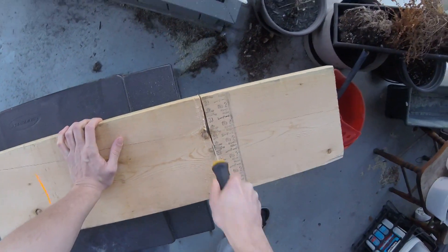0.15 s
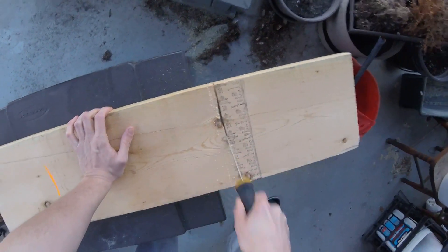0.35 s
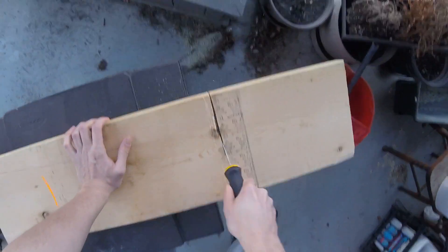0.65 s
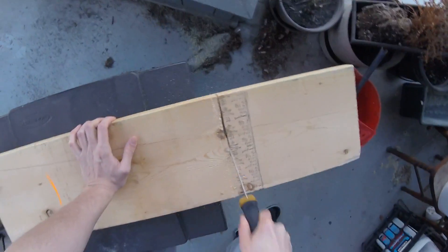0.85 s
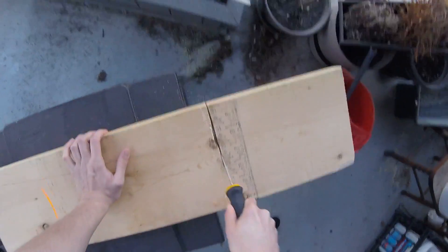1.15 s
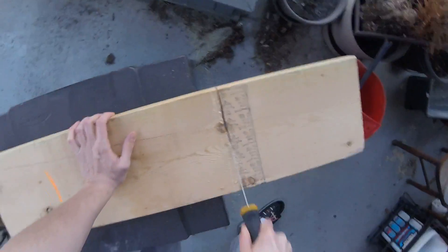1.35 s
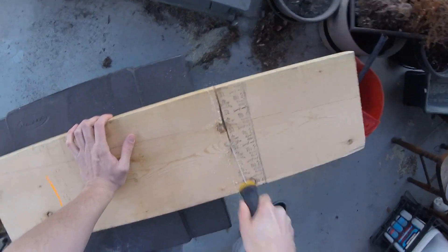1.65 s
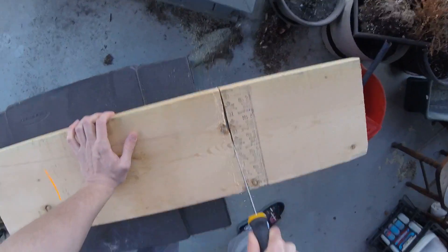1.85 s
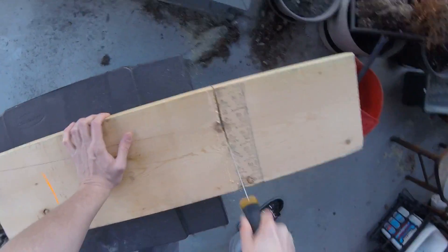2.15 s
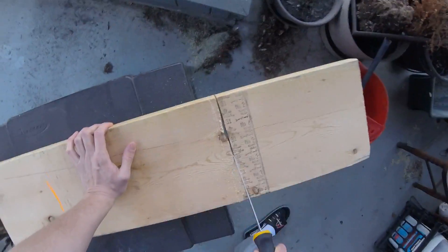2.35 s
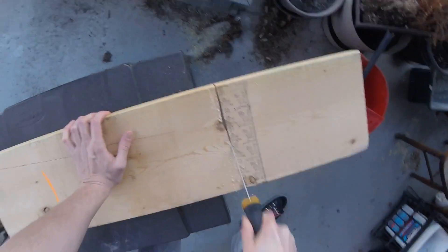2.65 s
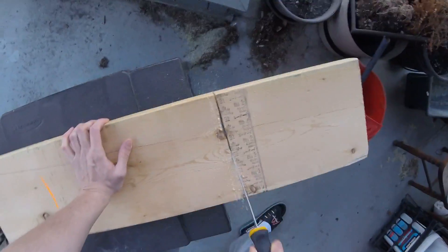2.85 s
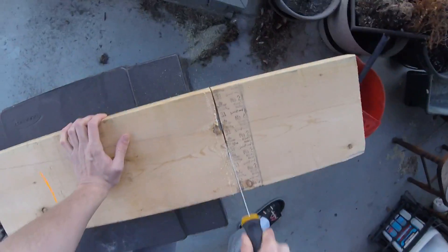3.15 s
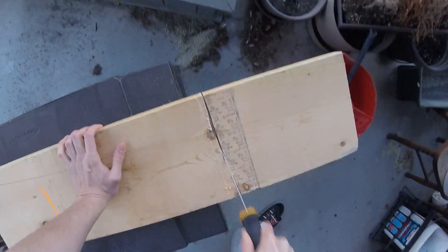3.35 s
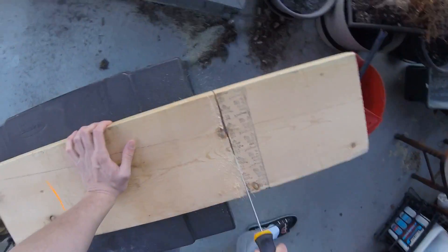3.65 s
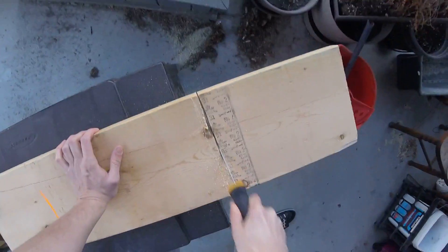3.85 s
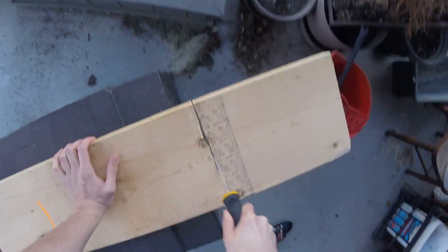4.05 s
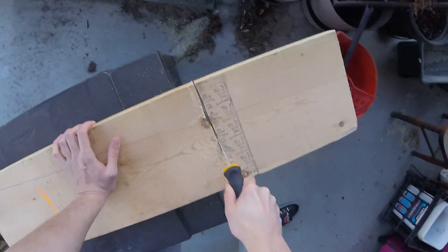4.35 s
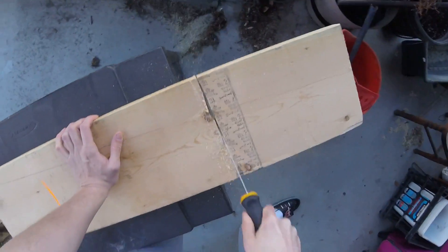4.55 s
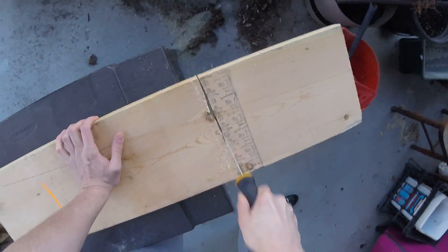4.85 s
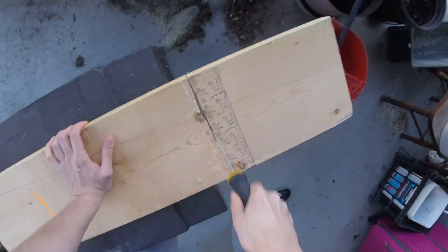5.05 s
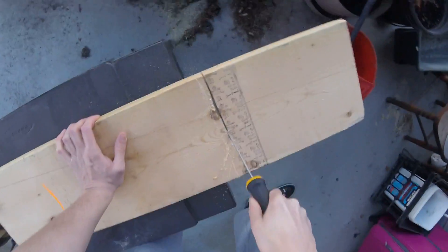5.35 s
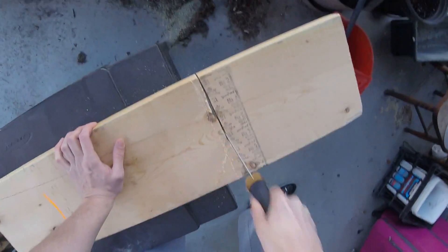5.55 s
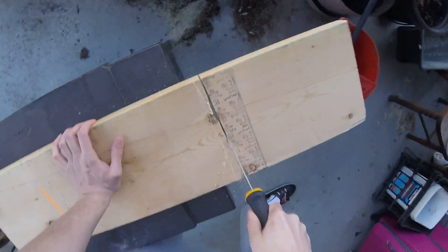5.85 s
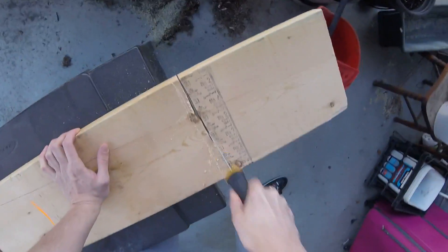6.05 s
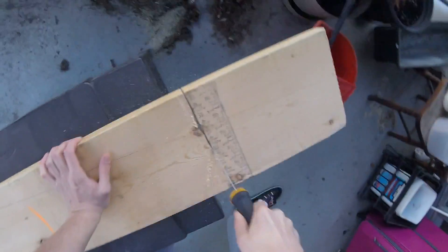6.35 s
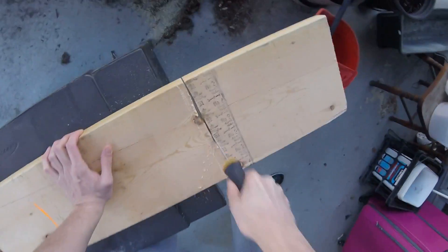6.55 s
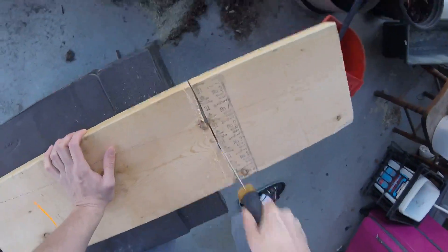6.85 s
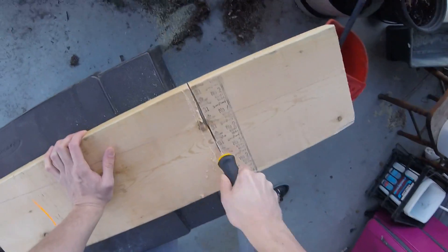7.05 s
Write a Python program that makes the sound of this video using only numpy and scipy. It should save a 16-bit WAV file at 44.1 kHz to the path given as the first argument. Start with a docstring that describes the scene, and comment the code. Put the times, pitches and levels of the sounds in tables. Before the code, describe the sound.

A small handsaw rasps quickly back and forth through a softwood board, hollow and woody with a metallic ring, while low wind buffets the microphone.

```python
"""Quick back-and-forth sawing: a small handsaw cuts a softwood board held by hand on a concrete patio.
The arm makes about four strokes each way per second. Tooth snaps and cracking fibres ring the board and blade
through resonances; shaped noise makes the hiss, and now and then the teeth bite in hard.
Around it are splinters, short reflections, a low boom from the board, jolts and air buffeting the microphone."""
import sys
import numpy as np
from scipy import signal
from scipy.fft import rfft, irfft
from scipy.io import wavfile

SR = 44100
rng = np.random.default_rng(int(sys.argv[2]) if len(sys.argv) > 2 else 0)


def file_out(sig):
    """Save sig as 16-bit WAV at sys.argv[1]."""
    # one column per channel
    cols = np.atleast_2d(sig).T
    # limit, then scale
    lim = np.clip(cols, -1, 1)
    pcm = np.round(lim * 32767).astype(np.int16)
    wavfile.write(sys.argv[1], SR, pcm)


N = 316638
TIME = np.arange(N) / SR

# Swings of the arm, a return and then the cut.
# Each row: time the teeth catch in seconds, length of the cut in seconds, cut effort in dB, return effort in dB.
STROKES = [(0.166, .098, 1.5, -4), (0.438, 0.087, 2.5, -4), (0.676, 0.09, -3, 4), (0.940, 0.087, -3.5, -6),
           (1.181, 0.099, -1.5, 2.5), (1.443, 0.11, 2, -0.5), (1.709, 0.096, 2, 3.5), (1.965, 0.11, -1, -3),
           (2.249, 0.086, 1, -4), (2.502, 0.088, 1, -4), (2.742, 0.085, 2.5, 0), (3.001, 0.11, 2, 0.5),
           (3.263, .103, -0.5, -2), (3.528, 0.091, 5, 2.5), (3.799, 0.11, 3.5, 3), (4.085, .120, 3, 2),
           (4.375, 0.11, -1, 2), (4.683, 0.1, 0, -4), (4.956, .096, 1, 1), (5.218, 0.1, 1, -3.5),
           (5.480, .082, 2, 0.5), (5.738, .105, -1.5, 1), (5.987, 0.087, -1.5, -1), (6.242, 0.09, -2.5, -4),
           (6.507, 0.077, -1.5, -6), (6.757, 0.097, -0.5, -2), (7.033, 0.096, -0.5, -3.5)]
TURN_S, REST_S = .029, .046   # pause after a cut; pause before the next cut
# Push at effort 0. One row: board in dB, blade in dB, scrape in dB, hiss in dB.
CUT_PUSH = (-21.5, -20, -28, -35.5)
RETURN_PUSH = (-29, -27, -30.5, -40)
# How much effort changes each push. One row: board, blade, scrape, hiss, all in dB per dB of effort.
PUSH_PER_EFFORT = (0.97, 1.35, 0.89, 0.66)
LOAD_BUILD_DB = 1.5   # rise of the load on board and blade along a cut
TOOTH_HZ = 700   # teeth per second at full speed, before random wander

# How freely the blade rings, as the hand leans on it. Each row: time in seconds, level change in dB.
BLADE_LEVEL = [(0, 1.5), (.5, -0.5), (1.0, 1.5), (1.5, 0.5), (2.0, 3), (2.4, -3), (3.2, 1.5), (3.6, -4),
               (4.0, -2.5), (4.7, -2.5), (5.2, -2.5), (5.8, -0.5), (7.1, 1)]
# How the hiss changes over the job. Each row: time in seconds, level change in dB.
HISS_LEVEL = [(0, -0.5), (1.1, -1.5), (2.3, 0), (3.6, 2.5), (4.25, -2), (4.8, 0.5), (5.5, -3.5),
              (6.5, -4.5), (7.15, -1)]

# The teeth dig into the wood.
# Each row: centre in seconds, bell width (centre to shoulder) in seconds, relative strength in dB, crunch 0 to 1.
BITES = [(0.491, 0.016, -10, 0.67), (0.743, 0.0099, -11.5, .5), (1.26, 0.0046, -8, 0.21),
         (1.526, 0.0065, -7, 1), (1.749, 0.009, -12, 0.46), (1.785, 0.0088, -11.5, .9),
         (2.051, 0.0095, -9.5, 0.43), (2.278, 0.012, -6.5, .09), (2.549, 0.029, -12, 0.24),
         (2.806, 0.0089, -11.5, 0.61), (3.079, 0.01, -10, .6), (3.324, 0.024, -13.5, .6),
         (3.557, 0.0051, -10, 0.16), (3.87, 0.015, -16.5, .5), (4.172, 0.015, -18, 0.9),
         (4.457, 0.0088, -10, 1), (4.754, 0.0078, -9, 0.14), (5.52, 0.028, -15, .5),
         (5.783, 0.011, -8.5, 0.3), (6.038, .016, -14, 0.34), (6.309, 0.017, -18.5, .5),
         (6.561, .016, -13, 0.15), (6.826, 0.031, -17, 0.45), (7.102, 0.0077, -8.5, 0.23)]
BITE_BLADE_DB = -10.5   # how much of a bite reaches the blade
# Short swells. Each row in these four: centre in seconds, bell width in seconds, relative strength in dB.
# The blade binds in the kerf (the slot it cuts) and rings.
BINDS = [(0.578, 0.012, -21.5), (0.745, 0.0062, -14.5), (0.987, 0.02, -25), (2.549, 0.019, -19),
         (3.324, 0.021, -16), (4.165, 0.016, -17.5), (4.412, 0.0083, -19), (4.456, 0.006, -14),
         (4.867, 0.013, -14.5), (5.135, .022, -24.5), (5.398, .018, -16.5)]
# Fibres split off during a cut with a bright rasp.
RASPS = [(0.232, .016, -27.5), (0.712, .01, -25), (1.75, .015, -26), (2.778, .011, -24), (3.565, .025, -23),
         (4.43, .02, -35), (4.995, 0.02, -29), (5.27, .02, -33), (7.085, 0.027, -26.5)]
# The backs of the teeth skid harshly on a return.
SKIDS = [(0.06, 0.036, -29.5), (0.577, .012, -29), (3.425, .016, -21.5), (4.28, 0.02, -19.5),
         (4.568, 0.011, -18.5), (4.868, 0.015, -21), (5.403, 0.012, -21.5)]
# The blade judders on a return.
JUDDERS = [(0.338, .012, -21)]

# Ringing tones of the wood. Each row: pitch in Hz, width in Hz, relative level in dB.
BOARD_MODES = [(418.4, 16.1, -0.5), (464, 14.5, 2.5), (542.4, 34, -12), (595.7, 16, -5), (729, 24.7, -9.5),
               (796, 18.3, -7.5)]
# Ringing tones of the blade, with the same columns: pitch in Hz, width in Hz, relative level in dB.
BLADE_MODES = [(945.7, 18.4, -3.5), (964, 33, -17), (1075, 39, 2.5), (1112.5, 29.5, -1.5),
               (1198, 133, -20.5), (1353.5, 53, -6.5), (1401.4, 109, -4), (1471, 66, -2), (1504, 63, -9.5)]
# Upper tones rung by the scraping teeth: pitch in Hz, width in Hz, relative level in dB.
SCRAPE_MODES = [(1644, 95, -5.5), (1777.5, 72, 2.5), (1815, 55, 6), (1912, 43, -4), (2137, 100, -3),
                (2246, 38, 2.5), (2407, 53, -3), (2703, 82, -6.5), (2935, 144, -8.5)]
# High tones of the steel: pitch in Hz, width in Hz, relative level in dB.
STEEL_MODES = [(3250, 220, -12), (3850, 150, -5.5), (4078, 39, 1.5), (4690, 180, -8), (5910, 170, -7.5),
               (9100, 310, -35), (11000, 400, -42)]

# Tone colour of the hiss, and of splinters. Each row: pitch in Hz, relative level in dB per Hz.
HISS_COLOUR = [(2500, -13.5), (3200, -2), (4300, -3), (5300, -1), (6200, -4), (6900, -5.5), (7600, -16.5),
               (9000, -15), (10000, -30), (11200, -30), (12000, -69)]
# Tone colour of the tooth backs skating: pitch in Hz, relative level in dB per Hz.
SKATE_COLOUR = [(700, -19), (1300, 4.5), (1900, -4), (2700, 0), (3500, -13), (4800, -13), (7000, -44)]
# Tone colour of the board's boom: pitch in Hz, relative level in dB per Hz.
BOOM_COLOUR = [(110, -13.5), (160, -0.5), (210, 7), (260, -9.5), (350, -8), (520, -1.5), (900, -33)]
# Tone colour of microphone jolts: pitch in Hz, relative level in dB per Hz.
JOLT_COLOUR = [(40, -13.5), (90, 2.5), (160, -6), (300, -6), (700, -33)]
# Tone colour of air buffeting the microphone: pitch in Hz, relative level in dB per Hz.
BUFFET_COLOUR = [(18, 3), (28, -1.5), (55, -0.5), (90, -3), (130, -5.5), (200, -11.5), (400, -16),
                 (900, -40.5)]
# Tone colour of the quiet outdoor air: pitch in Hz, relative level in dB per Hz.
AIR_COLOUR = [(100, -13.5), (500, -9), (1500, -13), (3000, -25), (6500, -31), (9000, -43.5), (12000, -67)]

# Splinters snap off. Each row: start in seconds, relative level in dB.
SPLINTERS = [(4.7419, -10), (5.709, -25.5), (6.0446, -19), (6.244, -18)]
# The microphone is jolted. Each row: start in seconds, relative level in dB.
JOLTS = [(1.611, -16.5), (1.671, -14.5), (2.109, -11.5), (3.019, -3.5), (3.425, -3), (3.629, -10.5),
         (4.119, -15), (5.699, -14), (6.559, -7), (6.93, -17)]
# How loudly the board booms on its support. Each row: time in seconds, level in dB.
ROCKING = [(0.2, -33), (0.5, -17.5), (0.76, -28.5), (1.6, -26.5), (2.6, -29.5), (3.1, -26), (3.85, -29),
           (4.45, -25.5), (5.0, -15.5), (5.5, -18), (6.3, -25), (6.85, -13), (7.15, -18)]
# The boom's peak as a share of the cut's length, then its rise and fall in dB per second.
BOOM_PEAK, BOOM_RISE_DB_PER_S, BOOM_FALL_DB_PER_S = 0.62, 212.5, 131.5
# The breeze on the microphone. Each row: time in seconds, level in dB.
BREEZE = [(0, -32.5), (.65, -32), (.85, -40.5), (1.5, -37), (1.7, -29.5), (2.3, -26.5), (2.9, -23.5),
          (3.2, -23), (3.9, -20.5), (4.35, -23.5), (4.9, -30.5), (5.3, -21.5), (6.35, -25), (6.9, -16.5),
          (7.18, -18)]
# Gusts on the microphone. Each row: centre in seconds, bell width in seconds, level in dB.
GUSTS = [(1.62, 0.014, -16), (1.7, 0.011, -23.5), (1.95, 0.027, -23), (3.19, .016, -20), (3.64, 0.025, -15),
         (3.82, .012, -16.5), (3.93, 0.02, -13), (4.12, 0.019, -13.5), (4.57, 0.028, -18.5),
         (5.71, 0.021, -13), (6.24, 0.016, -19), (6.55, .028, -9), (6.73, 0.015, -19), (6.95, .028, -11)]

CUTOFF_HZ = 11900   # top of the finished sound


def saw():
    """Teeth and fibres shake the board and the blade, and hiss in the kerf."""
    speed, returning, force = arm()
    board, blade, scrape, hiss = force * from_db(2.48 * drift(40))   # hard and soft grain
    board_bite, blade_bite = digging()
    snaps, tearing = teeth(speed), fibres()
    rub = 0.56 * snaps + 0.79 * tearing
    blade_bite = blade_bite + swells(BINDS) * rub
    body = ringing_body(board, blade, board_bite, blade_bite, rub, tearing, returning)
    # the whole plank flexes
    plank_force = board * rub + board_bite
    bending = from_db(-20) * resonate(plank_force, [(183.3, 8.2, -6.5), (213.0, 16.0, -1.5)])
    rasp = scraping(scrape, blade_bite, rub, returning)
    skate = skating(scrape, returning)
    return body + bending + rasp + skate + hissing(hiss, snaps, tearing)


def arm(catch_s=0.0071, release_s=0.0094):
    """Arm swings give blade speed 0 to 1, contact on returns, and the force on board, blade, scrape and hiss."""
    speed, returning, force = np.zeros(N), np.zeros(N), np.zeros((4, N))
    # share of each force that needs no speed: the hiss starts first
    rest = np.array([[.35], [.35], [.5], [.55]])
    for catch, release, cutting, levels in passes():
        near = slice(max(int((catch - .05) * SR), 0), int((release + .08) * SR))
        t = TIME[near]
        travel = np.clip((t - catch) / (release - catch), 0, 1)
        swing = np.sin(np.pi * travel ** .9)
        # the teeth catch abruptly and let go more gently
        grip = 1 / (1 + np.exp((catch - t) / catch_s))
        contact = grip / (1 + np.exp((t - release) / release_s))
        push = from_db(levels)[:, None] * contact * (rest + (1 - rest) * swing)
        # sawdust fills the teeth, so the load builds along a cut
        push[:2] *= from_db(LOAD_BUILD_DB * cutting * (travel - .5))
        speed[near] += swing
        returning[near] += contact * (1 - cutting)
        force[:, near] += push
    force[1] *= from_db(in_time(BLADE_LEVEL))
    force[3] *= from_db(in_time(HISS_LEVEL))
    return speed, returning, force


def passes():
    """Split each swing into a return and a cut: catch s, release s, cutting 0 or 1, dB of the four forces."""
    rows, last_release = [], 0
    for catch, length, cut_db, return_db in STROKES:
        release = catch + length
        return_levels = np.add(RETURN_PUSH, np.multiply(PUSH_PER_EFFORT, return_db))
        cut_levels = np.add(CUT_PUSH, np.multiply(PUSH_PER_EFFORT, cut_db))
        rows.append((last_release + TURN_S, catch - REST_S, 0, return_levels))
        rows.append((catch, release, 1, cut_levels))
        last_release = release
    return rows


def teeth(speed, jitter=.1, uneven_db=2.0, slowest=.3):
    """One snap per tooth, so the rasp rises and falls in pitch with the blade's speed."""
    rate = TOOTH_HZ * (slowest + (1 - slowest) * speed)
    rate = rate * np.exp(jitter * drift(90) + .08 * drift(3))
    passing = tooth_ticks(rate)
    snaps = passing * from_db(uneven_db * rng.standard_normal(N)) / np.sqrt(rate)
    return rms_one(snaps - np.mean(snaps))


def tooth_ticks(rate):
    """A single-sample tick each time another tooth passes, at a rate in teeth per second."""
    return np.diff(np.floor(np.cumsum(rate) / SR), prepend=0)


def fibres(per_s=14000, size_db=2.5, clump_db=0.73):
    """Small random cracks of tearing fibres, in clumps."""
    cracks = (rng.random(N) < per_s / SR) * rng.choice([-1, 1], N)
    sizes = from_db(size_db * np.minimum(rng.exponential(1, N), 4))
    return rms_one(cracks * sizes * from_db(clump_db * drift(110)))


def digging(tooth_hz=465, braking_s=.06, jitter=.07, uneven_db=5.0, ring_up_s=.005):
    """Smooth bites snap steadily near the board's main resonance; crunchy ones tear fibres and slow in pitch."""
    board, blade = np.zeros(N), np.zeros(N)
    wander, tearing = drift(120), fibres()
    heights = from_db(uneven_db * rng.standard_normal(N))
    for s, half, db, crunch in BITES:
        near = slice(max(int((s - .07) * SR), 0), int((s + .07) * SR))
        t = TIME[near] - s + ring_up_s   # the force peaks just before the ring does
        # the wood brakes the blade, most of all in a crunchy bite
        rate = tooth_hz * np.exp((.25 + crunch) * (jitter * wander[near] - t / braking_s))
        snaps = tooth_ticks(rate) * heights[near]
        snaps = rms_one(snaps - snaps.mean())
        torn = 0.94 * crunch
        bump = np.exp(-(t / half) ** 2 / 2)
        mixture = np.sqrt(1 - torn) * snaps + np.sqrt(torn) * tearing[near]
        board[near] += from_db(db - 2.5) * bump * mixture
        blade[near] += from_db(db + BITE_BLADE_DB) * bump * (0.71 * snaps + 0.62 * tearing[near])
    return board, blade


def ringing_body(board, blade, board_bite, blade_bite, rub, tearing, returning):
    """Rubbing and bites ring the wood and the flexing blade at their own resonances."""
    wood_force = board * rub * (1 - 0.21 * returning) + board_bite
    wood = from_db(0.58) * driven(wood_force, BOARD_MODES, vary_db=1.5)
    # the blade judders as it skates back
    judder_force = (board * returning + swells(JUDDERS)) * tearing
    wood += from_db(-1.5) * resonate(judder_force, [(613.7, 40, 0)])
    plate = from_db(-0.36) * flex(driven(blade * rub + blade_bite, BLADE_MODES, vary_db=1.5))
    body = filtered(wood + plate, 4, 2100, "low")
    return filtered(body, 2, 260, "high")


def scraping(scrape, blade_bite, rub, returning):
    """Cutting teeth ring the upper modes, less strongly on the way back."""
    scrape_force = np.hypot(scrape, swells(RASPS)) * rub * (1 - 0.41 * returning)
    force = scrape_force + from_db(-23.5) * blade_bite
    rasp = from_db(1.94) * flex(resonate(force, SCRAPE_MODES, vary_db=2.5))
    return filtered(rasp, 3, [1300, 3700], "band")


def skating(scrape, returning):
    """On the way back the backs of the teeth skate with a broader rasp."""
    level = np.hypot(scrape * returning, swells(SKIDS))
    return from_db(-3.0) * colour(level * fibres(), SKATE_COLOUR)


def hissing(hiss, snaps, tearing):
    """Friction in the kerf makes noisy hiss and rings the high tones of the steel."""
    friction = hiss * (0.36 * snaps + 0.75 * tearing + .5 * rng.standard_normal(N))
    steel = filtered(resonate(hiss * fibres(), STEEL_MODES), 4, 8000, "low")
    return from_db(-1.0) * colour(friction, HISS_COLOUR) + from_db(-3.5) * steel


def flex(x, depth_s=0.0002):
    """The blade bends as it travels, which pulls its resonances slightly sharp and flat."""
    return np.interp(TIME + depth_s * drift(3.34), TIME, x)


def splinters():
    """Splinters snap off as very short puffs of bright noise."""
    return from_db(-7.5) * bursts(SPLINTERS, HISS_COLOUR, decay_s=0.0012)


def yard(x, t60=0.53):
    """Short scattered reflections off the concrete and the things around."""
    t = TIME[:SR // 3]
    # random echoes fading at 60 dB per t60 seconds, after a short gap
    response = rng.standard_normal(len(t)) * from_db(-60 * t / t60) * (t > .005)
    return signal.fftconvolve(x, response / np.linalg.norm(response))[:N]


def board_boom():
    """Clumped knocks excite the low boom of the board on its support."""
    knocks = rocking() * fibres(per_s=1400, size_db=3.0, clump_db=4.5)
    thud = from_db(-2) * colour(knocks, BOOM_COLOUR)
    return thud + from_db(-5.5) * resonate(knocks, [(185.3, 5.0, -2.5)])


def rocking():
    """Each cut loads the board on its support: the boom builds under it, then dies away."""
    level = np.zeros(N)
    for catch, length, _, _ in STROKES:
        t = TIME - catch - BOOM_PEAK * length
        shape_db = np.minimum(BOOM_RISE_DB_PER_S * t, -BOOM_FALL_DB_PER_S * t)
        level = np.maximum(level, from_db(shape_db))
    return level * from_db(in_time(ROCKING))


def jolts():
    """Jolts of the microphone are quickly fading low noise."""
    return from_db(-6.0) * bursts(JOLTS, JOLT_COLOUR, decay_s=0.013)


def buffeting():
    """Lumpy low noise is moving air on the microphone, swelling in the gusts."""
    buffet = colour(rng.standard_normal(N), BUFFET_COLOUR) * rms_one(from_db(3.7 * drift(42)))
    return np.hypot(from_db(in_time(BREEZE)), swells(GUSTS)) * buffet


def outdoor_air():
    """Quiet outdoor air is steady coloured noise."""
    return from_db(-40.5) * colour(rng.standard_normal(N), AIR_COLOUR)


def driven(force, modes, vary_db, window_s=0.071, ring_s=0.0072):
    """Resonances that give back the power put into them, so the loudness follows the arm's push."""
    ring = resonate(force, modes, vary_db)
    keep = np.exp(-1 / (ring_s * SR))
    fed = signal.lfilter([1 - keep], [1, -keep], force ** 2)
    window = np.hanning(int(2 * window_s * SR))
    # the tiny offset avoids dividing by zero in silence
    put_in = np.abs(signal.fftconvolve(fed, window, "same")) + 1e-6
    given_out = np.abs(signal.fftconvolve(ring ** 2, window, "same")) + 1e-6
    return ring * np.sqrt(put_in / given_out)


def resonate(force, modes, vary_db=0):
    """Side-by-side resonances; as the contact moves, each can take a changing share of the force."""
    out, power = 0, 0
    for k, (hz, width, db) in enumerate(modes):
        r = np.exp(-np.pi * width / SR)   # a narrower resonance rings longer
        top = (1 - r * r) / 2
        share = rms_one(from_db(vary_db * drift(3.6))) if vary_db else 1
        feedback = [1, -2 * r * np.cos(2 * np.pi * hz / SR), r * r]
        ring = signal.lfilter([top, 0, -top], feedback, force * share)
        out = out + (-1) ** k * from_db(db) * ring   # neighbours have opposite signs
        power += top * from_db(db) ** 2
    return out / np.sqrt(power)


def colour(x, spectrum, size=4096):
    """Give a sound a tone colour without echo ahead of it; white noise keeps its power."""
    hz, db = np.transpose(spectrum)
    grid = np.log(np.maximum(np.arange(size // 2 + 1) * SR / size, 1))
    # the level falls away beyond both ends of the table
    beyond = np.maximum(grid - np.log(hz[-1]), 0) + np.maximum(np.log(hz[0]) - grid, 0)
    level_db = np.interp(grid, np.log(hz), db) - 20 * beyond
    # folding the cepstrum (spectrum of the log level) puts the filter's energy as early as possible
    cepstrum = irfft(np.log(from_db(level_db)))
    cepstrum[1:size // 2] *= 2
    cepstrum[size // 2 + 1:] = 0
    response = irfft(np.exp(rfft(cepstrum)))
    return signal.fftconvolve(x, response / np.linalg.norm(response))[:N]


def filtered(x, order, hz, kind):
    """Keep the low, high or band part of a sound with a smooth filter."""
    return signal.sosfilt(signal.butter(order, hz, kind, fs=SR, output="sos"), x)


def bursts(events, spectrum, decay_s):
    """A quickly dying puff of coloured noise for each event."""
    level = np.zeros(N)
    for s, db in events:
        start = int(s * SR)
        level[start:] += from_db(db) * np.exp(-TIME[:N - start] / decay_s)
    return colour(level * rng.standard_normal(N), spectrum)


def swells(events):
    """Add up a bell-shaped swell for each centre, width and dB level."""
    total = np.zeros(N)
    for s, half, db in events:
        total += from_db(db) * np.exp(-np.minimum(((TIME - s) / half) ** 2 / 2, 20))
    return total


def in_time(curve):
    """Join a curve's time and value points with straight lines, giving a value at every sample."""
    return np.interp(TIME, *np.transpose(curve))


def drift(rate):
    """Smooth random wander with overall size 1, changing about rate times a second."""
    r = np.exp(-40 * np.pi * rate / SR)   # one step is 20 samples
    noise = rng.standard_normal(N // 20 + 4002)
    slow = signal.lfilter([1], [1, -2 * r, r * r], noise)[4000:]   # skip the start-up
    return np.interp(np.arange(N) / 20, np.arange(len(slow)), rms_one(slow))


def rms_one(x):
    """Scale to an rms (average strength) of 1."""
    return x / np.sqrt(np.mean(x ** 2) + 1e-20)


def from_db(db):
    """Turn decibels into a multiplier."""
    return 10 ** (np.asarray(db) / 20)


def scene():
    """Mix the saw and splinters, their reflections, the boom, jolts, buffeting and quiet air."""
    cut = saw() + splinters()
    reflections = from_db(-12.5) * yard(cut)
    mix = cut + reflections + board_boom() + jolts() + buffeting() + outdoor_air()
    return mix[None]   # one channel


def record(dry):
    """Round the peaks softly, then cut the top of the treble."""
    top = .85   # ceiling of the rounded peaks
    rounded = dry / (1 + (dry / top) ** 4) ** (1 / 4)
    return signal.sosfilt(signal.ellip(10, .1, 80, CUTOFF_HZ, fs=SR, output="sos"), rounded)


dry = scene()
out = record(dry)
file_out(out)
```